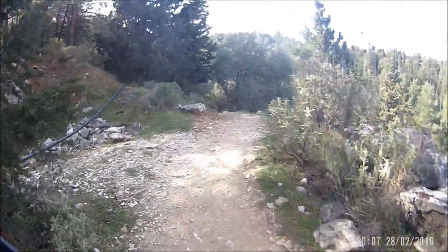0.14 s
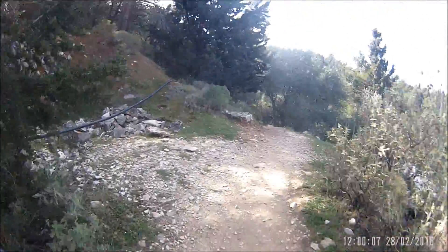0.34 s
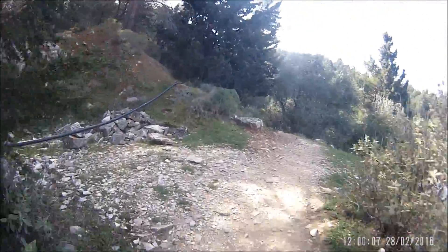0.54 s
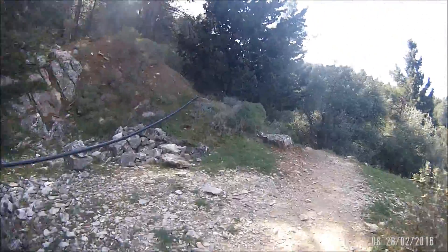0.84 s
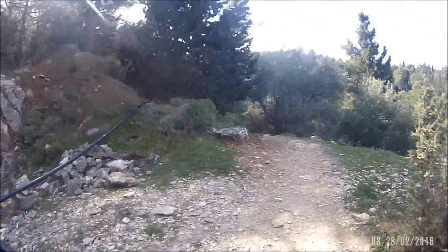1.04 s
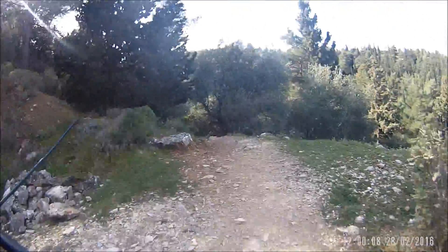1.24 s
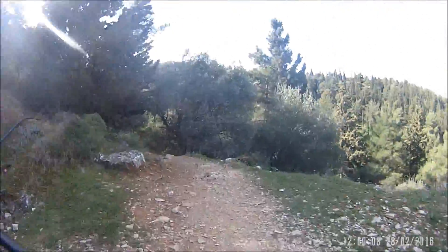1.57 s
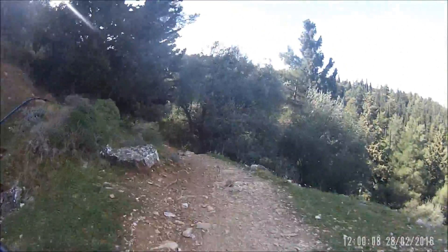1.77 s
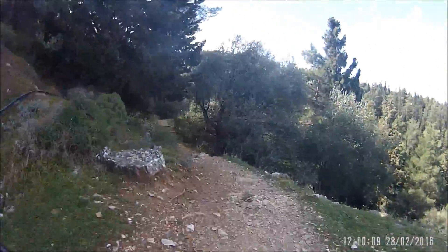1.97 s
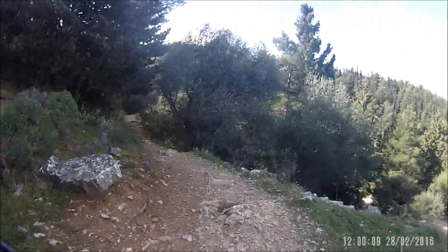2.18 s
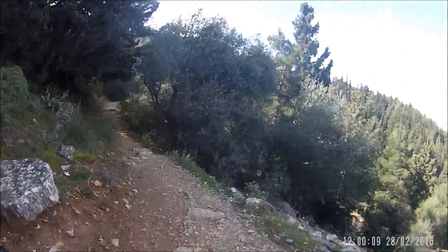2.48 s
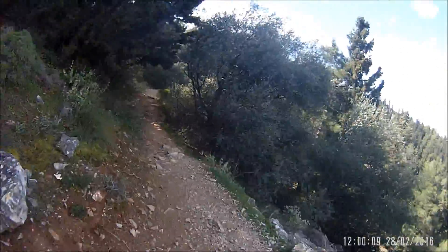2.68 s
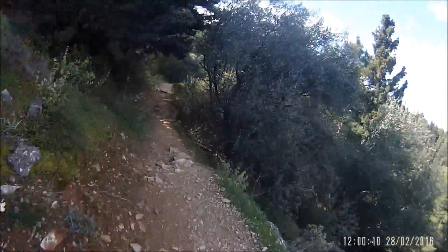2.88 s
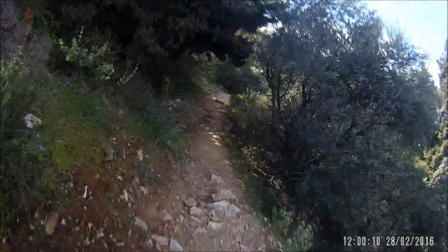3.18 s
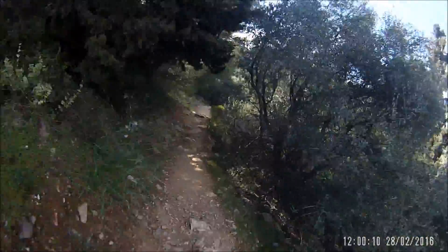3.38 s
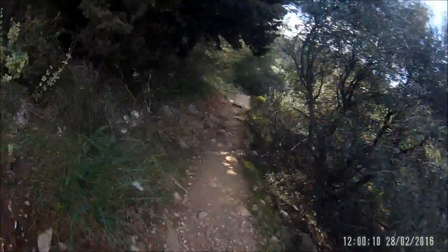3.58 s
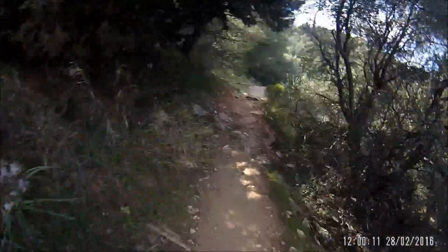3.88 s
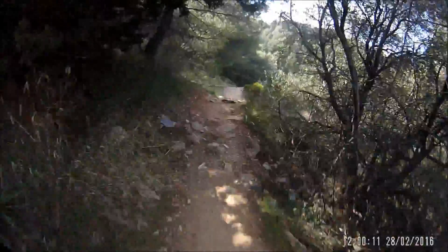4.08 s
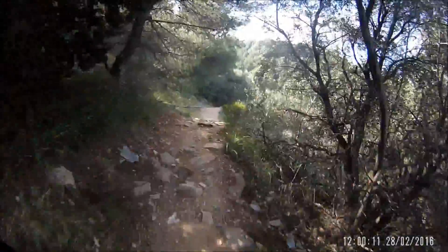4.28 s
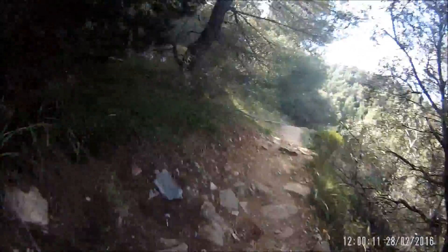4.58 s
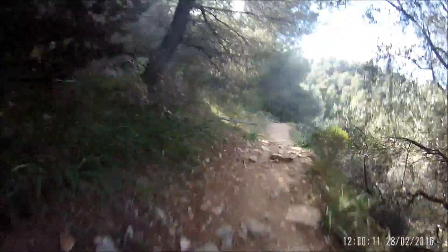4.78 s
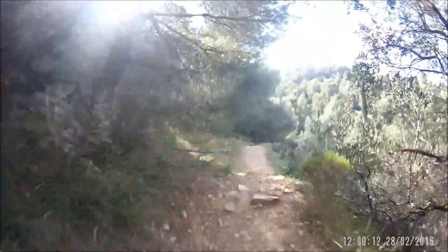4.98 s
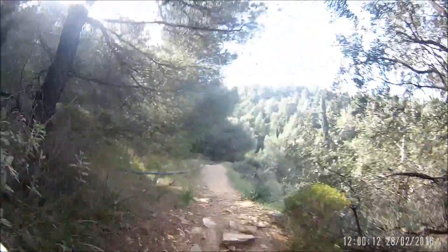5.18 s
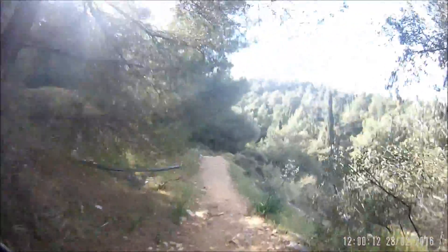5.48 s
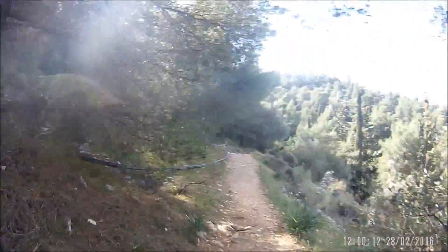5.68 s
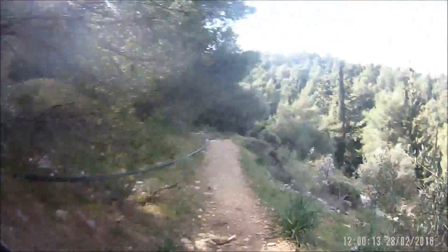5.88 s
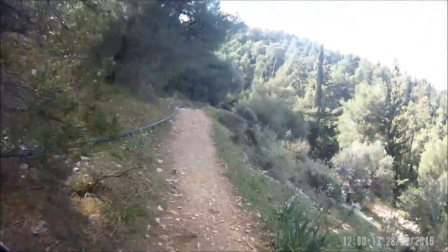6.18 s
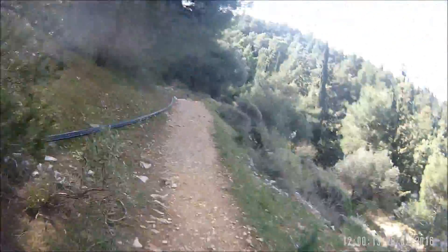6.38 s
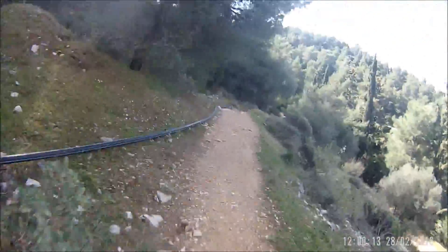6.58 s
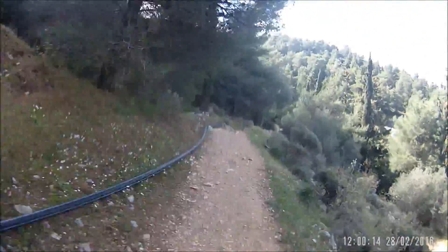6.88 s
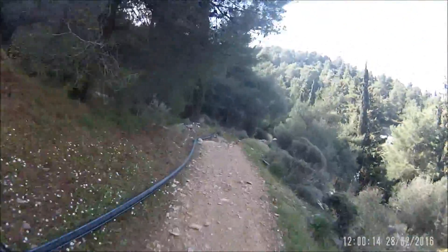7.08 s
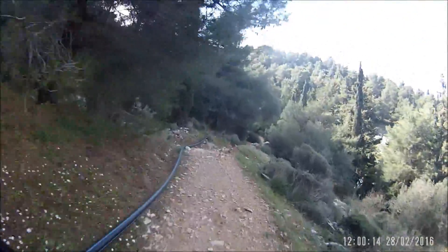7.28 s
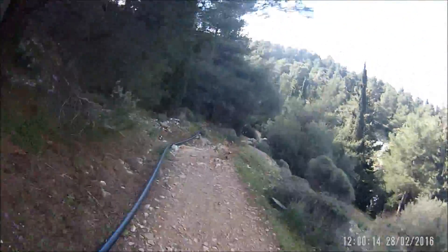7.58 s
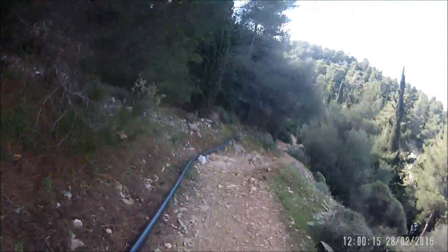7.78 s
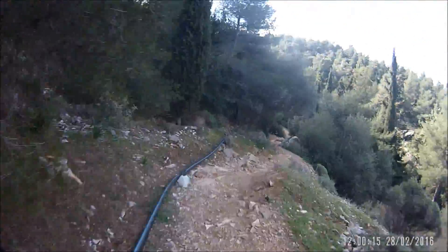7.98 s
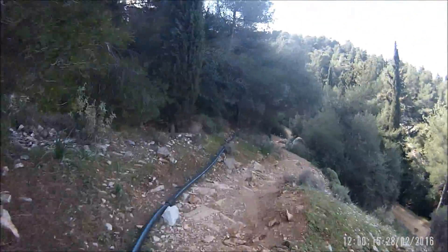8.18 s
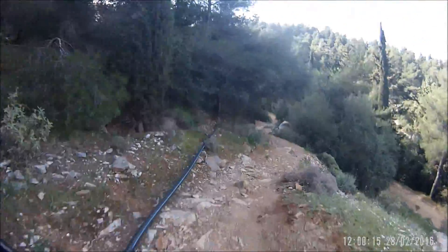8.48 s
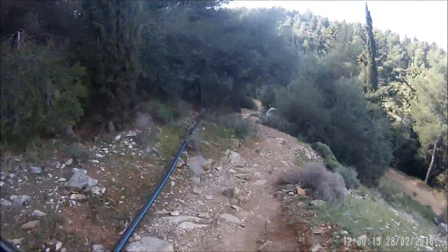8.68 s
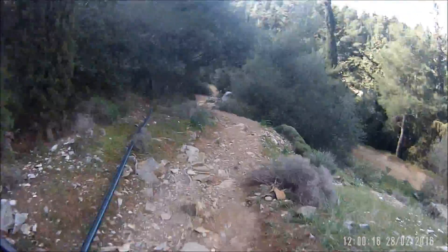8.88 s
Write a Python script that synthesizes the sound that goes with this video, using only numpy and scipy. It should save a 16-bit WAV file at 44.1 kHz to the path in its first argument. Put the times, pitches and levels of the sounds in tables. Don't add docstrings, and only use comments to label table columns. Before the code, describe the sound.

Handlebar-mounted plastic case clatters and knocks as a bike bounces over stones, with grit ticking, deep thumps and faint steady hiss.

```python
import sys
import numpy as np
from scipy import signal
from scipy.fft import rfft, irfft
from scipy.io import wavfile
from scipy.ndimage import uniform_filter1d

SR = 44100
rng = np.random.default_rng(int(sys.argv[2]) if len(sys.argv) > 2 else 0)


def inscribe(sig):
    pcm = np.round(np.clip(np.atleast_2d(sig).T, -1, 1) * 32767)
    wavfile.write(sys.argv[1], SR, pcm.astype(np.int16))


def to_linear_factor(level_db):
    exponent = np.asarray(level_db, float) / 20
    return 10 ** exponent


N = 434385

# [f/Hz, level/dB per Hz]
HISS_SPECTRUM = [(260, -72), (450, -34), (616, -5.5), (9770, -20), (10800, -21), (14600, -21.5),
                 (16000, -18)]
HISS_DB = -62
# [f/Hz, rms level/dB]
WHINE = [(10519, -76.5)]

# [f/Hz, width/Hz, level/dB]
SHELL_MODES = [(444, 210, 4), (917, 314, 4.5), (1305, 393, 3.5), (1827, 310, 4.5), (2635, 478, 1.5),
               (3104, 860, -3)]
CAVITY_MODES = [(4380, 1060, 5.5), (4660, 815, 6.25)]
EDGE_MODES = [(6840, 920, -0.5), (8580, 810, 0.5), (9800, 1600, -6), (11900, 2000, -40)]
# [f/Hz, width/Hz, level/dB]
BAR_MODES = [(118.2, 57, -4), (158.6, 72.4, 1.5), (208.3, 98.6, -2), (300, 139, -11.5)]

# [t/s, level/dB]
GROUND = [(0.0, -67), (0.96, -64), (1.81, -51), (2.33, -53), (2.91, -45.5), (4.39, -47.5), (4.63, -54.5),
          (4.88, -50.5), (5.1, -49), (5.87, -55), (6.45, -57), (6.69, -42), (7.16, -55), (7.6, -53),
          (8.04, -44), (8.7, -53.5), (9.11, -49), (9.85, -50)]
GROUND_MEAN_DB = -54
SHAKE_DB, SHAKE_FOLLOWS = -39, 0.61
DEEP_DB, DEEP_FOLLOWS = -40, 0.31
DEEP_JOLT_DB = -10
SLOW_UNTIL_S, FAST_FROM_S, SLOW_DEEP_DB, SLOW_SHAKE_DB = 0.9, 1.1, -2.5, -7.5

# [t/s, level/dB]
BRAKE = [
    (7.6, -61),
    (8.2, -57),
    (9.0, -50.5),
    (9.5, -57.5),
    (9.85, -57),
]
# [f/Hz, width/Hz, level/dB]
PAD_MODES = [(980, 280, 4), (1580, 380, 0), (4630, 250, -2)]
BRAKE_ON_S, BRAKE_WOBBLE_DB = 7.4, 2.0

# [t/s, peak level/dB, f/Hz, rise/s]
TAPS = [
    (.162, -28.5, 300, 0.0043),
    (0.177, -35, 247, 0.0062),
    (0.451, -39, 317, 0.0036),
    (0.972, -29, 188, .004),
    (9.468, -38, 920, 0.0051),
]

# [t/s, peak level/dB]
TICKS = [(1.4168, -32), (1.5888, -30.5), (2.3478, -31.0), (2.3607, -26), (2.3784, -28.5), (2.4323, -28.5),
         (2.6982, -25.0), (2.8635, -25.5), (2.9936, -29), (3.6185, -25.5), (3.6461, -23), (4.1085, -28),
         (4.1807, -24), (4.9123, -23), (4.9252, -28), (4.986, -47), (5.229, -32), (5.6011, -29),
         (6.192, -30), (6.4849, -33.0), (6.5007, -32), (7.178, -26), (7.4391, -29.5), (7.7296, -24.0),
         (8.0101, -24), (8.0481, -25.5), (8.1713, -23.5), (8.867, -29), (9.3807, -25), (9.811, -26.5),
         (0.1253, -40), (0.162, -38), (0.9702, -41), (1.1946, -34.5), (1.478, -30.5), (1.6297, -33.5),
          (2.0554, -32.5), (2.2585, -30.5), (2.5367, -30.5), (2.7567, -33.5), (3.1506, -24.5),
          (3.1933, -29), (3.4905, -25.5), (3.5455, -30), (4.1214, -26), (4.3177, -30), (4.3504, -24),
          (4.5413, -24.5), (5.2429, -27), (5.681, -27), (5.949, -32), (5.979, -29), (6.4491, -30),
          (6.5223, -27.5), (6.5817, -28), (6.7027, -29), (7.3036, -29.5), (7.5405, -31), (8.2385, -28),
          (9.0403, -31),
         (0.2641, -44.5), (1.067, -40), (1.52, -40), (1.6292, -34.5), (2.2114, -34), (2.3017, -36.5),
          (2.5767, -32), (2.6232, -34.5), (2.8017, -26), (2.9568, -33), (3.005, -29), (3.285, -22.5),
          (4.2479, -19), (4.2797, -16), (4.3795, -30), (5.1156, -19.5), (5.36, -32), (5.8573, -35),
          (6.3602, -35), (6.6827, -27.5), (6.758, -33.5), (7.0346, -30), (7.7576, -35), (8.1814, -27),
          (8.3945, -31), (8.4974, -31), (8.6396, -30), (9.1306, -34), (9.4142, -30), (9.6353, -33)]
# [t/s, peak level/dB]
BUMPS = [(1.196, -26), (1.483, -25.5), (2.367, -20), (3.0, -20.5), (3.065, -27), (3.195, -22.5),
         (3.475, -20.5), (3.622, -15), (4.113, -12), (4.357, -19.5), (4.443, -18.5), (4.93, -21),
         (4.99, -20.5), (5.213, -14.5), (5.227, -20), (5.266, -23), (5.511, -21), (5.608, -16),
         (5.627, -17.5), (6.133, -14), (6.166, -16), (6.488, -18.5), (6.803, -23), (7.011, -17),
         (7.547, -18), (7.734, -21), (8.052, -17), (8.871, -20), (9.109, -14.5), (9.677, -28)]
# [t/s, tick peak level/dB, thud peak level/dB]
STONES = [(1.5637, -27.5, -33.0), (1.7614, -33, -18.5), (1.9693, -25, -19), (2.0147, -27, -20),
          (2.8111, -29.5, -18.5), (2.8822, -30, -25), (3.102, -26, -16), (3.1687, -23, -13.5),
          (3.509, -23.5, -32), (3.6966, -25.5, -22), (3.7688, -28, -22), (3.8164, -24, -20.0),
          (3.8364, -21.5, -24), (3.907, -23.5, -19), (3.9484, -23, -18.5), (4.083, -26.0, -38),
          (4.137, -23.5, -16), (4.1553, -25, -15.5), (4.1905, -26.0, -41), (4.5127, -23.5, -19.5),
          (5.0562, -29, -33), (5.1015, -29, -17.5), (5.5123, -25.5, -44), (7.343, -32, -18),
          (7.5581, -25.5, -18.5), (8.1326, -29.5, -22), (8.5544, -29, -16.5), (8.969, -23, -20.5),
          (9.4816, -58, -16), (9.679, -28.0, -46)]
# [t/s, cavity peak level/dB, shell peak level/dB, thud peak level/dB]
ROCKS = [(1.4086, -18, -22.5, -18.0), (1.9486, -21, -22, -11.5), (2.0386, -27, -30, -19),
         (2.8557, -44.0, -25, -18.5), (2.9356, -21.5, -23.5, -14.5), (3.2736, -22, -22, -13.5),
         (3.6613, -14, -19, -12.5), (3.8945, -26, -19.0, -35), (3.9816, -16, -21, -19),
         (4.2215, -13, -13.5, -6), (4.5266, -25.5, -30, -27.0), (4.8778, -28, -25, -14),
         (5.07, -19.0, -20, -11), (5.1212, -21.5, -23, -24), (5.2598, -22, -22.5, -36),
         (5.4233, -22.5, -24.5, -46), (5.5686, -24, -17.5, -15), (6.1251, -21.5, -20.5, -19),
         (6.5577, -26.0, -26.5, -25), (6.6066, -18, -16, -11.5), (6.8434, -21, -21, -14.5),
         (6.8904, -20.5, -15.5, -19.5), (6.9888, -28, -22.5, -23), (7.5853, -22, -22.5, -15.5),
         (7.829, -26, -24.5, -17.5), (8.1168, -18, -27, -13.0), (8.2739, -26.0, -25.0, -15.5),
         (8.5921, -23, -24.5, -20.0), (8.9268, -17.5, -20, -16), (9.2808, -19.5, -17.5, -12)]
# [t/s, cavity peak level/dB, shell peak level/dB, thud peak level/dB]
REBOUNDS = [(3.3001, -33, -23.5, -24), (3.3142, -25, -22, -20), (4.2419, -33.0, -29, -17),
            (4.2529, -19, -15, -32), (4.2651, -20, -17, -13), (4.2843, -22.5, -23, -13),
            (4.5582, -28, -27, -15), (4.5763, -28, -25, -15.5), (4.8978, -17.5, -20.5, -18),
            (5.165, -24, -23, -22), (5.1828, -19, -21, -9.5), (5.2004, -17, -20.5, -17),
            (5.4664, -30, -19, -40), (5.484, -19.5, -22.5, -28), (5.4976, -20, -18.5, -33),
            (5.5875, -16.5, -22.5, -15), (6.1435, -31, -37, -21), (6.1552, -32.0, -23.5, -35),
            (6.169, -22, -26.5, -30), (6.181, -25, -36, -29), (6.6281, -23, -22, -16),
            (6.6426, -28, -23.5, -14.0), (7.0, -20.5, -20, -39), (7.603, -26.5, -41, -15),
            (7.8657, -27, -24, -19.5), (7.8815, -26, -27, -17.5), (7.8896, -39, -22, -18),
            (8.945, -38, -21, -15.5), (9.3077, -17.5, -20, -12.5), (9.322, -23, -24.0, -17)]
KNOCKS = ROCKS + REBOUNDS

EDGE_UNDER_DB, EDGE_SPREAD_DB = -18.5, -2
CHATTER_DB, CHATTER_FOLLOWS, CHATTER_SPREAD_DB = -40, 1.0, 16.5
CHATTER_SHELL_DB, CHATTER_EDGE_DB, CHATTER_LEAN_DB = 1.5, -24.5, 8.5
LEAD_S, LEAD_SPREAD_S, LEAD_DB = 0.0036, 0.008, -12.5
THUD_LAG_S, THUD_RISE_S = 0.0027, 0.0043
THUD_HZ, THUD_SPREAD_HZ, THUD_HZ_PER_DB = 178, 22.6, 1.5
SWING_SCATTER = 0.25


def rms_one(x):
    return x / np.sqrt(np.mean(x ** 2) + 1e-20)


def peak_one(rows):
    return rows / np.abs(rows).max(axis=1, keepdims=True)


def drift(rate_hz):
    r = np.exp(-2 * np.pi * rate_hz / SR)
    noise = rng.standard_normal(N + SR)
    return rms_one(signal.lfilter([1], [1, -2 * r, r * r], noise)[SR:])


def cut(x, hz, kind, order=4):
    return signal.sosfilt(signal.butter(order, hz, kind, fs=SR, output="sos"), x)


def body(x, modes):
    out = 0
    for k, (hz, width_hz, db) in enumerate(modes):
        r = np.exp(-np.pi * width_hz / SR)
        poles = [1, -2 * r * np.cos(2 * np.pi * hz / SR), r * r]
        mode = signal.lfilter([(1 - r * r) / 2, 0, (r * r - 1) / 2], poles, x)
        out = out + (-1) ** k * to_linear_factor(db) * mode
    return out


def place(times, rows):
    out = np.zeros(N + rows.shape[1])
    start = np.round(np.asarray(times) * SR).astype(int)
    at = start[:, None] + np.arange(rows.shape[1])
    np.add.at(out, at, rows)
    return out[:N]


def through_case(x):
    shell = cut(body(x, SHELL_MODES), 5100, "low", order=2)
    cavity = cut(body(x, CAVITY_MODES), 5980, "low", order=8)
    edge = cut(body(x, EDGE_MODES), 6280, "high", order=6)
    return shell, cavity, cut(edge, 18000, "low", order=4)


def contacts(s, cavity_db, shell_db, edge_db):
    t = np.arange(900) / SR - 0.005
    width_s = 0.0005 + 0.0008 * rng.random((len(s), 1))
    skirt = np.exp(np.where(t < 0, t / 0.0061, -t / 0.0047))
    pressure = np.exp(-(t / width_s) ** 2) + to_linear_factor(-14.0) * skirt
    shell, cavity, edge = through_case(rng.standard_normal((len(s), 900)) * pressure)
    shell = cut(shell, 1120, "high", order=1)
    rows = to_linear_factor(cavity_db - 2.5)[:, None] * peak_one(cavity)
    rows = rows + to_linear_factor(shell_db - 0.5)[:, None] * peak_one(shell)
    rows = rows + to_linear_factor(edge_db)[:, None] * peak_one(edge)
    return place(s - 0.0055, rows)


def swings(s, peak_db, hz, rise_s):
    t = np.arange(2600) / SR
    shape = to_linear_factor(peak_db) * (t / rise_s * np.exp(1 - t / rise_s)) ** 1.19
    miss = SWING_SCATTER * (2 * rng.random((len(s), 1)) - 1)
    phase = 2 * np.pi * (hz * (t - rise_s) - 1 / 4 + miss)
    swing = np.sin(phase) + 0.11 * np.sin(2 * phase + 2.32)
    at = (s - rise_s)[:, 0]
    return place(at, shape * swing), place(at, shape)


def grains(per_s, spread_db, clump_db):
    sizes = to_linear_factor(spread_db * np.minimum(rng.exponential(1, N), 4))
    sizes = sizes * rng.choice([-1, 1], N)
    struck = rng.random(N) < per_s * to_linear_factor(clump_db * drift(25)) / SR
    return sizes * struck + 1e-18


def crackle(per_s, clump):
    sizes = to_linear_factor(3.04 * np.minimum(rng.exponential(1, N), 2.3))
    struck = rng.random(N) < per_s * clump / SR
    bursts = np.convolve(sizes * struck, np.hanning(110), "same")
    return (bursts + 0.25) * rng.standard_normal(N)


def electronics():
    hz = np.fft.rfftfreq(N, 1 / SR)[1:]
    points = np.array(HISS_SPECTRUM)
    colour = to_linear_factor(np.interp(np.log(hz), np.log(points[:, 0]), points[:, 1]))
    hiss = irfft(rfft(rng.standard_normal(N)) * np.append(0, colour), N)
    t = np.arange(N) / SR
    whine = sum(to_linear_factor(db) * np.sqrt(2) * np.sin(2 * np.pi * f * t) for f, db in WHINE)
    return to_linear_factor(HISS_DB) * rms_one(hiss) + whine


def rumble(deep_db, shake_db, jolt):
    deep = cut(cut(rng.standard_normal(N), 71, "low", order=2), 52.7, "high", order=2)
    contact = grains(250, spread_db=4.0, clump_db=3.0)
    shake = cut(body(contact, BAR_MODES), 530, "low", order=2)
    deep_level = to_linear_factor(deep_db + 3.0 + 3.78 * drift(20.0))
    deep_level = deep_level + to_linear_factor(DEEP_JOLT_DB) * uniform_filter1d(jolt, size=3000)
    return deep_level * rms_one(deep) + to_linear_factor(shake_db + 2.0) * rms_one(shake)


def clamp(shake_db, jolt):
    dull = cut(cut(rng.standard_normal(N), 800, "low", order=2), 270, "high", order=2)
    return (to_linear_factor(shake_db - 23) + to_linear_factor(-27) * jolt) * rms_one(dull)


def grit(grit_db, jolt):
    clump = to_linear_factor(3.0 * drift(25))
    both = crackle(50, clump)
    shell = through_case(both + crackle(130, clump))[0]
    _, cavity, edge = through_case(both + crackle(140, clump))
    level = to_linear_factor(grit_db - 3.5) + to_linear_factor(-24.5) * jolt
    return level * rms_one(shell + to_linear_factor(-6.5) * cavity + to_linear_factor(-21.5) * edge)


def brake():
    s, level_db = np.transpose(BRAKE)
    rub = rms_one(body(body(rng.standard_normal(N), PAD_MODES), PAD_MODES))
    t = np.arange(N) / SR
    level = to_linear_factor(np.interp(t, s, level_db) + BRAKE_WOBBLE_DB * drift(7.8))
    return level * rub * (t > BRAKE_ON_S)


def cable_taps():
    return swings(*np.transpose(TAPS)[:, :, None])[0]


def chatter(rough_db, count=330):
    where, size, lean, bright = rng.random((count, 4)).T
    s = 0.01 + where * (N / SR - 0.05)
    peak_db = CHATTER_DB + CHATTER_FOLLOWS * rough_db[(s * SR).astype(int)] - CHATTER_SPREAD_DB * size
    lean_db = CHATTER_LEAN_DB * (2 * lean - 1)
    edge_db = peak_db + CHATTER_EDGE_DB + 6.8 * bright
    stray = contacts(s, peak_db + lean_db, peak_db - lean_db + CHATTER_SHELL_DB, edge_db)
    s, cavity_db, shell_db, _ = np.transpose(KNOCKS)
    s = s - LEAD_S - LEAD_SPREAD_S * rng.random(len(s))
    slip_db = shell_db + LEAD_DB
    return stray + contacts(s, cavity_db + LEAD_DB, slip_db, slip_db + EDGE_UNDER_DB)


def kicks(light):
    knocks = [(s, shell_db) for s, _, shell_db, _ in KNOCKS]
    s, peak_db = np.transpose(knocks + list(light))
    push = np.hanning(60) * rng.choice([-1, 1], len(s))[:, None]
    force = place(s, to_linear_factor(peak_db + 22)[:, None] * push)
    return cut(body(force, BAR_MODES), 447, "low", order=2)


def rattle(light):
    s, peak_db = np.transpose(light)
    lean_db, bright_db = rng.normal(0, 1, (len(s), 2)).T
    tick_cavity_db = peak_db - 2.5 + 3 * lean_db
    tick_shell_db = peak_db - 0.5 - 0.5 * lean_db
    ticks = contacts(s, tick_cavity_db, tick_shell_db, peak_db - 18.5 + 2.9 * bright_db)
    s, cavity_db, shell_db, _ = np.transpose(KNOCKS)
    edge_db = np.maximum(cavity_db, shell_db) + EDGE_UNDER_DB
    edge_db = edge_db + EDGE_SPREAD_DB * rng.standard_normal(len(s))
    return contacts(s, cavity_db, shell_db, edge_db) + ticks


def jolts():
    blows = [(row[0] + THUD_LAG_S, row[-1]) for row in KNOCKS + STONES] + BUMPS
    s, peak_db = np.transpose(blows)[:, :, None]
    hz = THUD_HZ + THUD_SPREAD_HZ * rng.standard_normal((len(s), 1))
    hz = hz + THUD_HZ_PER_DB * (peak_db - peak_db.mean())
    return swings(s, peak_db, hz, THUD_RISE_S)


def scene():
    t = np.arange(N) / SR
    grit_db = np.interp(t, *np.transpose(GROUND))
    rough_db = grit_db - GROUND_MEAN_DB
    slow = np.interp(t, [SLOW_UNTIL_S, FAST_FROM_S], [1, 0])
    deep_db = DEEP_DB + DEEP_FOLLOWS * rough_db + SLOW_DEEP_DB * slow
    shake_db = SHAKE_DB + SHAKE_FOLLOWS * rough_db + SLOW_SHAKE_DB * slow
    light = np.vstack([TICKS, np.array(STONES)[:, :2]])
    thuds, jolt = jolts()
    background = electronics() + rumble(deep_db, shake_db, jolt) + clamp(shake_db, jolt)
    loose = grit(grit_db, jolt) + brake() + cable_taps()
    case = chatter(rough_db) + kicks(light) + rattle(light)
    return (background + loose + case + thuds)[None]


def top_cut(x):
    return signal.sosfilt(signal.butter(12, 16320, fs=SR, output="sos"), x)


def record(dry):
    low_pass = signal.cheby2(12, 60, 15950, fs=SR, output="sos")
    mix = signal.sosfilt(low_pass, dry)
    return top_cut(mix)


dry = scene()
out = record(dry)
inscribe(out)
```